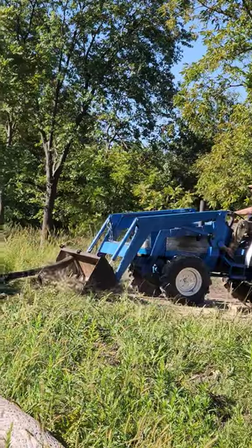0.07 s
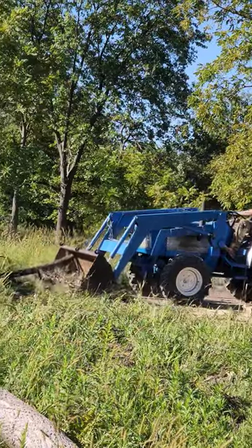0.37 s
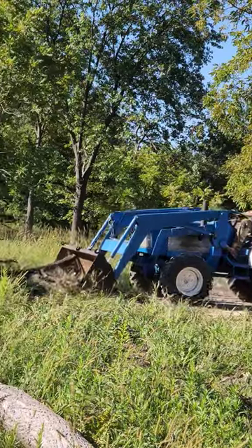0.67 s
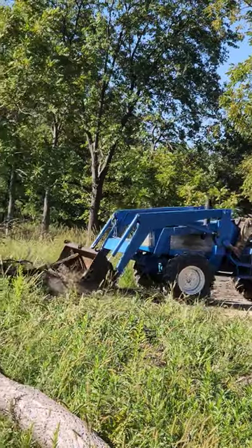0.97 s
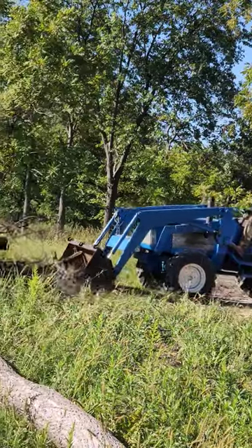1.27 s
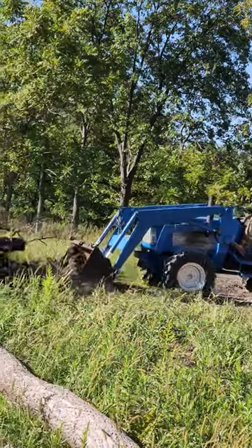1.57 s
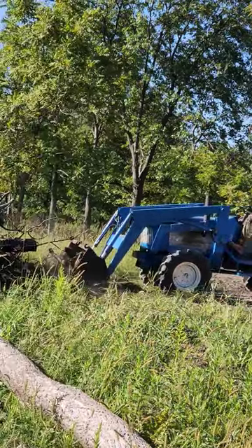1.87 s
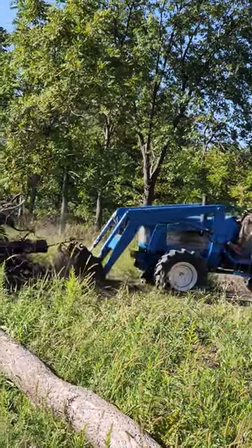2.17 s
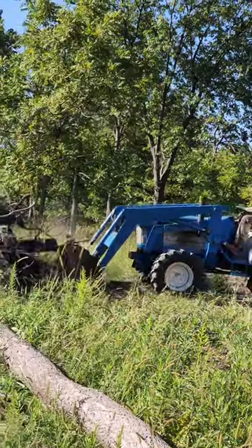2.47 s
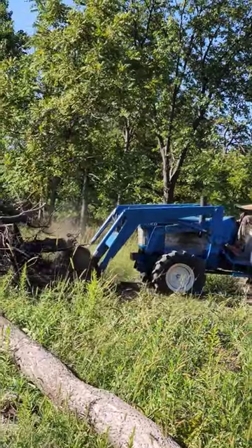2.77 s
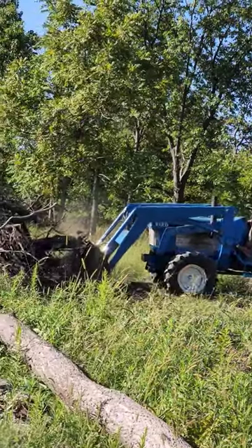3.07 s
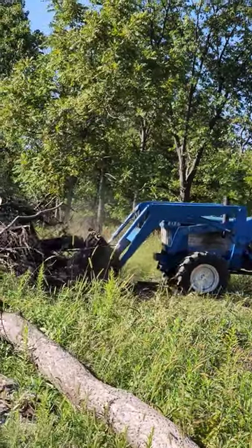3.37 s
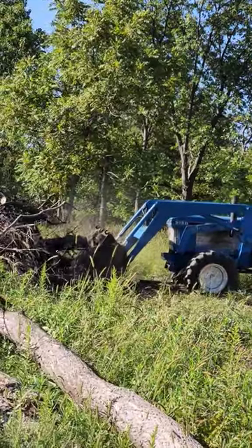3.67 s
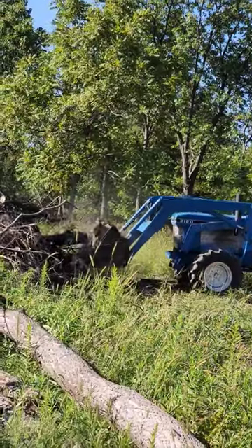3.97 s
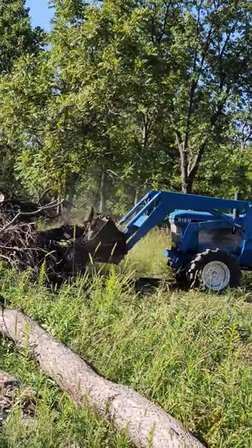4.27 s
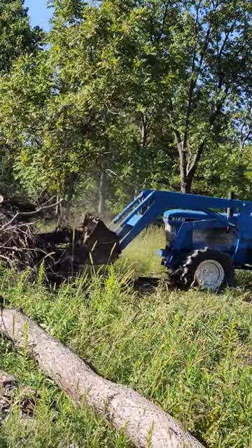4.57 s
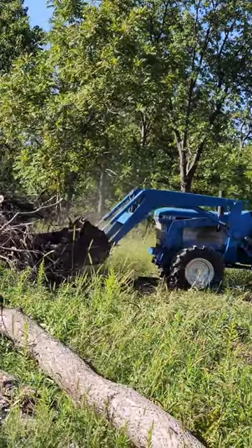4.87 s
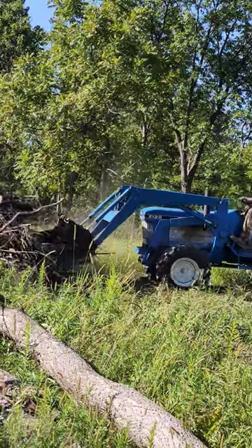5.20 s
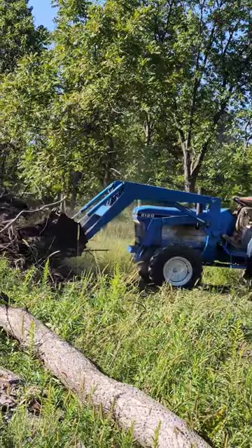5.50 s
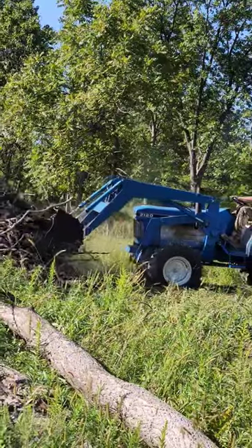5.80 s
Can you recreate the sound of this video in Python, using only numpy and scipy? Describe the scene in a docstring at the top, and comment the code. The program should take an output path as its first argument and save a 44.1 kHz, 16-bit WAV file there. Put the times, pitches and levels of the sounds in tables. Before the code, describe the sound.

A diesel tractor runs throughout, some way off in a field, with a throbbing exhaust, clattering engine and light gear whine. Beneath it, dry twigs rustle and earth grinds as its loader pushes a pile. A sharp branch snap comes at 0.4 seconds, and more cracks follow irregularly, faintly echoed by the trees. Limbs squeak and scrape on the steel bucket from about 0.7 to 1.3 seconds. At 1.7 seconds a log strikes the bucket with a short, hollow boom. More snaps and brief squeaks come between 2.4 and 3 seconds. From 3 to nearly 5 seconds the bucket lifts: the pump rattles and the gears sing louder, the engine speeding up a little around 3.8 seconds. It then slows and works harder, lowest near 5.2 seconds. The rustling and grinding grow, with loud cracks around 5.4 and 5.7 seconds and a squeak between them.

```python
"""A diesel tractor, some way off in a field, shoves logs and brush into a pile with its loader.
From the start the exhaust throbs, the engine clatters and gears whine, over rustling twigs and grinding earth.
Soon branches snap, echoed faintly by the trees, and limbs squeak and scrape on the steel bucket.
Next a log booms against the bucket. Halfway through, the bucket lifts: its pump rattles and the gears
sing louder. Near the end the engine slows under the load and works harder as more branches break."""
import sys
import numpy as np
from scipy import signal
from scipy.fft import rfft, irfft, next_fast_len
from scipy.io import wavfile
from scipy.ndimage import uniform_filter1d, map_coordinates

SR = 44100
rng = np.random.default_rng(int(sys.argv[2]) if len(sys.argv) > 2 else 0)


def bounce(signal):
    """Save signal as a 16-bit WAV file at the path given by the first command-line argument."""
    frames = np.transpose(np.atleast_2d(signal))
    limited = np.clip(frames, -1, 1)
    pcm = np.round(limited * 32767).astype(np.int16)
    wavfile.write(sys.argv[1], SR, pcm)


N = 261954
FREE_RATE, RATED_RATE = 48.6, 40.61  # engine firings a second: with no load, at rated load


def amp(db):
    """Turn decibels (dB) into a number to multiply a sound by."""
    return 10 ** (np.asarray(db) / 20)


def unit(x):
    """Scale a signal so that its average strength (rms) is 1."""
    return x / np.sqrt(np.mean(x ** 2) + 1e-20)


def along(points, hz):
    """Read between rows of (Hz, value), with all octaves equally wide."""
    pitches, values = np.transpose(points)
    return np.interp(np.log(hz + 1), np.log(pitches + 1), values)


def curve(rows):
    """Join rows of (seconds, value) with straight lines, one value per sample."""
    times, values = np.transpose(rows)
    return np.interp(np.arange(N) / SR, times, values)


def wobble(rate):
    """A smooth random curve through `rate` new values a second."""
    return map_coordinates(rng.standard_normal(int(N * rate / SR) + 4), [np.arange(N) * rate / SR])


def coloured(x, level_db):
    """Make each frequency of x louder or softer by level_db(Hz)."""
    n = x.shape[-1]
    m = 2 * next_fast_len(n // 2 + 4096)
    cepstrum = irfft(np.log(amp(level_db(np.fft.rfftfreq(m, 1 / SR)))))
    cepstrum[1:m // 2] *= 2  # folded so that the filter rings after a hit, never before
    cepstrum[m // 2 + 1:] = 0
    return irfft(rfft(x, m) * np.exp(rfft(cepstrum)))[..., :n]


def spread(pair):
    """Mix two unrelated signals into left and right, most alike in the upper bass."""
    # Each row: frequency in Hz, how alike the sides are from 0 to 1.
    alike = [(60, 0.28), (130, .995), (290, 0.85), (640, 0.79), (1200, 0.19), (2200, 0.92), (4000, 0.47),
             (7000, 0.42), (14000, 0.19)]
    angle = np.arccos(np.clip(along(alike, np.fft.rfftfreq(N, 1 / SR)), 0, .999)) / 2
    mid, side = irfft(rfft(pair) * [np.cos(angle), np.sin(angle)], N)
    return unit(np.array([mid + side, mid - side]))


def add(track, start, sound):
    """Mix a sound into the track at `start` seconds."""
    part = track[..., round(start * SR):][..., :sound.shape[-1]]
    part += sound[..., :part.shape[-1]]


def throb(firings, depth, lead):
    """Swell once per firing, `lead` of a firing ahead of the exhaust puff."""
    return 1 + depth * np.cos(2 * np.pi * (firings + lead))


def governor(rate):
    """Engine load in dB: the further the speed sags, the more fuel the engine is fed."""
    fuel = np.maximum(FREE_RATE - rate, .5) / (FREE_RATE - RATED_RATE)
    return 0.87 * 20 * np.log10(fuel)


def exhaust(firings, load_db):
    """One puff per firing, echoed by the pipe; load strengthens the overtones and the rumbling gas."""
    # Each row: pitch as a multiple of the firing rate, base level in dB.
    tones = [(1, -31), (2, -30.5), (3, -33), (3.5, -87), (4, -33), (4.5, -55), (5, -39), (6, -48), (7, -45),
             (10, -67)]
    # Each row: frequency in Hz, relative level of the rumble in dB.
    rumble_colour = [(20, -46), (38, -2.5), (70, -4), (110, -1), (165, 0.5), (230, -4), (300, -10),
                     (380, -23.5), (450, -14), (540, -38), (900, -40.5)]
    note = np.zeros(N)
    for multiple, db in tones:
        db_per_load = np.interp(multiple, [0.79, 1.7, 5.1, 6], [-0.29, 0.49, 0.77, 2.2])
        flutter_db = 0.2 * np.sqrt(multiple / 2) * wobble(15)
        angle = 2 * np.pi * multiple * firings - 0.036 * multiple ** 2  # the muffler delays high tones
        echo = .45 * np.cos(angle - 2 * np.pi * multiple * .6)
        note += np.sqrt(2) * amp(db + db_per_load * load_db + flutter_db) * (np.cos(angle) + echo)
    gas = rng.standard_normal((2, N)) * throb(firings, depth=0.27, lead=0.29)
    rumble = spread(coloured(gas, lambda hz: along(rumble_colour, hz)))
    return note + amp(-35 + 0.73 * load_db) * rumble


def casing(hz):
    """How strongly the engine block and its panels ring at each frequency, in dB."""
    # Each row: frequency in Hz, relative level in dB.
    block = [(250, -38.5), (420, -15), (560, -12.5), (650, -4), (800, -3), (1000, 1.5), (1300, -0.5),
             (1480, -8), (1950, -5), (2700, -10), (3400, -16.5), (4300, -17), (8000, -28), (12000, -47)]
    # Each row: a panel's pitch in Hz, width in Hz, boost or cut in dB.
    panels = [(668, 57, 3.5), (800, 36, 6), (960, 99, 2), (1308, 200, 5), (1580, 120, -2), (1960, 390, 1.5),
              (2337, 52, -28), (2693, 260, 7)]
    panels_db = sum(db / (1 + (2 * (hz - centre) / width) ** 2) for centre, width, db in panels)
    return along(block, hz) + panels_db


def clatter(firings, colour, cycle_firings=3, knocks_per_firing=12):
    """A pattern of knocks repeats each engine cycle and rings metal whose tone is colour(Hz), in dB."""
    count = cycle_firings * knocks_per_firing
    places = (np.arange(count) + rng.uniform(-.5, 0.4934, count)) / knocks_per_firing
    pattern = throb(places, depth=0.38, lead=0.21) * amp(2.04 * rng.standard_normal(count))
    cycles = np.arange(-cycle_firings, firings[-1], cycle_firings)[:, None]
    at = np.interp((cycles + places).ravel(), firings, np.arange(N), left=-N, right=-N)
    at += SR * 3e-5 * rng.standard_normal(len(at))  # each knock lands a little early or late
    blows = (pattern * amp(2.85 * rng.standard_normal((len(cycles), count)))).ravel()
    inside = (at > 0) & (at < N - 1)
    knocks = np.bincount(np.round(at[inside]).astype(int), blows[inside], N)
    t = np.arange(SR // 30) / SR
    spectrum = rfft(rng.standard_normal((2, len(t))) * amp(-60 * t / 0.033))
    smear = irfft(spectrum / np.abs(spectrum))  # each knock spreads evenly over all pitches
    rattle = unit(signal.fftconvolve(knocks[None], smear, axes=1)[:, :N])
    rush = rng.standard_normal((2, N)) * throb(firings, depth=0.08, lead=0.24)
    return spread(coloured(rattle + amp(-6) * rush, colour))


def gears(firings, rate):
    """Meeting gear teeth whine, loudest when their pitch matches a note at which the housing rings."""
    # Each row: teeth per firing, housing note in Hz, its width in Hz, base level on that note in dB.
    wheels = [(15, 647, 52, -48.5), (30, 1346, 60, -49)]
    out = np.zeros(N)
    for teeth, ring_hz, width_hz, db in wheels:
        ring = 1 / (1 + (2 * (teeth * rate - ring_hz) / width_hz) ** 2)
        level = amp(db + 3 * wobble(24.96) + 2 * wobble(3.92))  # a fast waver and a slow swell
        out += ring * level * np.sin(2 * np.pi * teeth * firings + 0.33 * wobble(50))
    return out


def brush(firings):
    """Dry twigs crackle in clumps over a hiss that pulses with the engine."""
    # Each row: frequency in Hz, relative level in dB.
    colour = [(1500, -13.5), (2600, 0.5), (3300, 10), (4400, -4.5), (5200, 2.5), (7900, 0.5), (9900, -9.5),
              (11600, -3.5), (13500, -5), (15500, -10)]
    clumps = wobble(16)
    breaks = rng.random(N) < 260 / SR * amp(6 * clumps)
    twigs = breaks * amp(np.minimum(4.6 * rng.exponential(size=N), 15))
    t = np.arange(SR // 60) / SR
    tick = rng.standard_normal((2, len(t))) * amp(-60 * t / 0.01)
    crackle = signal.fftconvolve(twigs[None], tick, axes=1)[:, :N]
    hiss = rng.standard_normal((2, N)) * throb(firings, depth=0.42, lead=0.25) * amp(0.53 * clumps)
    return spread(coloured(hiss + amp(-4.5) * unit(crackle), lambda hz: along(colour, hz)))


def earth(load_db):
    """Soil and logs grind along in lumps, louder the more the push loads the engine."""
    # Each row: frequency in Hz, relative level in dB.
    colour = [(120, -13.5), (190, -1.5), (270, 1), (350, -7), (450, -17), (560, -27), (740, -10.5),
              (1000, -13.5), (1500, -31), (3000, -46)]
    grind = spread(coloured(rng.standard_normal((2, N)), lambda hz: along(colour, hz)))
    lumps_db = 2.5 * wobble(20)
    return amp(-44 + 1.7 * load_db + lumps_db) * grind


def snap(db, bright_db, fade_s, bright_from_hz=830):
    """Wood breaks with one sharp crack; its fibres go on splintering for a moment."""
    # Each row: frequency in Hz, relative level in dB.
    colour = [(300, -24), (1000, -13.5), (2600, -3), (4200, 0.5), (5500, -2.5), (8300, -2.5), (10000, -12),
              (11600, -4), (13500, -14), (15500, -21)]
    t = np.arange(SR // 8) / SR
    grain = rng.standard_normal(len(t)) + 0.95 * rng.standard_normal((2, len(t)))
    fibres = unit(uniform_filter1d(rng.exponential(size=len(t)) ** 2, size=30))
    splinters = amp(-21 + 0.53 * db - 60 * t / .07) * fibres
    burst = grain * (amp(db - 60 * t / fade_s) + splinters)
    crack = coloured(
        burst, lambda hz: along(colour, hz) + bright_db * np.log2(np.maximum(hz / bright_from_hz, 1)))
    return amp(db) * crack / crack[:, :130].std()  # the first 3 milliseconds set the level


def snaps(sticks_per_s=2):
    """Big branches break, and small sticks give way at random between them."""
    # Each row: start in seconds, level in dB, treble boost in dB per octave, seconds to fade by 60 dB.
    branches = [(0.412, -21, -1.5, 0.01), (0.6291, -29.5, -6.5, 0.011), (0.702, -36.5, 5, .01),
                (0.7804, -27.5, 5, 0.0072), (1.084, -33.5, -3.5, .008), (1.356, -34.5, -0.5, 0.027),
                (1.690, -29.5, 0.5, 0.016), (2.384, -30, 2.5, .008), (2.5297, -29.5, -0.5, .007),
                (2.690, -34.5, 1, 0.034), (2.9031, -25.5, -2.5, 0.0092), (3.024, -35.5, -1, .015),
                (4.289, -35, -5, .006), (4.4436, -33, -2.5, 0.0071), (4.782, -35.5, 3, 0.008),
                (5.081, -35.5, 4, .008), (5.162, -35.5, 1, .008), (5.365, -30, 2, 0.009),
                (5.3712, -21, -9, 0.025), (5.392, -28.5, -3.5, 0.012), (5.72, -26, -1, .012)]
    out = np.zeros((2, N))
    for start, db, bright_db, fade_s in branches:
        add(out, start, snap(db, bright_db, fade_s))
    for place, softer_db in rng.random((round(sticks_per_s * N / SR), 2)):
        add(out, place * N / SR, snap(-37.5 - softer_db, bright_db=0, fade_s=.008))
    return out


def trees(sound):
    """The tree line scatters a sound back as a soft, half-second echo."""
    t = np.arange(SR // 2) / SR
    tail = rng.standard_normal((2, len(t))) * amp(-60 * t / .5) * (1 - np.exp(-t / 0.077))
    return signal.fftconvolve(sound, tail / np.linalg.norm(tail[0]), axes=1)[:, :N]


def slip(length_s, start_hz, end_hz, rough):
    """Wood catches and slides on steel, making a rough chirp that swells and fades."""
    n = int(length_s * SR)
    scatter = unit(uniform_filter1d(rng.standard_normal(n), size=40))
    hz = np.linspace(start_hz, end_hz, n) * (1 + rough * scatter)
    return np.hanning(n) * np.sin(2 * np.pi * np.cumsum(hz) / SR)


def squeaks(scrape_hz=1345, scrape_fall=0.0726):
    """Single limbs squeak on the bucket; its scraping is a run of overlapping, falling squeals."""
    # Each row: start in seconds, length in seconds, first pitch in Hz, last pitch in Hz, peak in dB.
    limbs = [(0.737, 0.037, 3000, 2550, -35), (2.606, 0.031, 2830, 2680, -31),
             (2.956, 0.049, 1866, 1930, -36), (5.602, 0.038, 3450, 2690, -33)]
    out = np.zeros(N)
    for start, length_s, start_hz, end_hz, db in limbs:
        add(out, start, amp(db) * slip(length_s, start_hz, end_hz, rough=.075))
    for start in np.arange(0.93, 1.2, .088):
        add(out, start, amp(-37.5) * slip(0.116, scrape_hz, scrape_hz * (1 - scrape_fall), rough=0.032))
    return out


def booms():
    """A log knocks on the bucket, whose broad plate swells into a short, hollow boom."""
    # Each row: start in seconds, level of the boom in dB, level of the knock in dB.
    hits = [(1.7347, 2, -22), (1.82, -18, -37)]
    # Each row: a pitch of the bucket in Hz, relative level in dB, seconds to fade by 60 dB.
    bucket_notes = [(219, 2, 0.11), (198, -20, 0.049), (258, -11.5, 0.099), (335, -19, 0.18),
                    (483, -22, 0.035), (653, -19, 0.055), (833, -34, 0.12)]
    knock_colour = [(150, 8), (700, 11), (1600, -1), (5000, -16)]  # Each row: Hz, relative dB.
    out, t = np.zeros(N), np.arange(SR // 2) / SR
    ring = sum(amp(db - 60 * t / fade_s) * np.sin(2 * np.pi * hz * t) for hz, db, fade_s in bucket_notes)
    swell = 1 - np.exp(-t / .013)
    for start, boom_db, knock_db in hits:
        knock = unit(coloured(rng.standard_normal(len(t)), lambda hz: along(knock_colour, hz)))
        add(out, start, amp(boom_db) * ring * swell + amp(knock_db - 60 * t / 0.079) * knock)
    return out


def pump(firings, rate, lift_start_s=2.96, lift_end_s=4.85, ramp_s=0.12):
    """The oil pump rattles while it lifts the bucket, and the gears that always drive it sing louder."""
    # Each row: frequency in Hz, relative level of the rattle in dB.
    colour = [(1000, -17.5), (1600, -10), (1850, 3.5), (2150, 8.5), (2450, -10), (2900, -4), (3400, -4),
              (4500, -24.5)]
    t = np.arange(N) / SR
    lift = np.clip(np.minimum(t - lift_start_s, lift_end_s - t) / ramp_s, 0, 1)
    rattle = clatter(firings, lambda hz: along(colour, hz))
    return amp(-50) * lift * rattle + amp(5 * lift) * gears(firings, rate)


def scene():
    """The engine's speed drives all its sounds; the bucket stirs brush and earth, and wood breaks."""
    # Each row: time in seconds, engine firings a second.
    speed = [(0.1, 42.79), (0.3, 43.09), (0.52, 41.92), (0.82, 43.17), (1.2, 42.27), (1.72, 40.73),
             (2.25, 42.31), (2.68, 40.36), (3.05, 42.58), (3.35, 43.07), (3.75, 45.78), (4.15, 45.19),
             (4.52, 42.99), (4.85, 40.12), (5.2, 38.26), (5.94, 40.85)]
    # Each row: time in seconds, base level of the rustling brush in dB.
    rustle = [(0.27, -47), (0.36, -47.5), (1.49, -44), (2.02, -50.5), (3.3, -47.5), (4.31, -47.5),
              (4.74, -49.5), (5.12, -46), (5.51, -42.5), (5.94, -43.5)]
    rate, rustle_db = curve(speed), curve(rustle)
    firings = np.cumsum(rate * (1 + .0015 * wobble(30))) / SR  # a running count
    firings -= firings[round(0.1 * SR)]  # one firing falls at 0.1 seconds
    load_db = governor(rate)
    # The pipe draws away from the microphones, played here as a slowly easing exhaust load.
    away_db = 0.37 * (np.arange(N) - N / 2) / SR
    push_db = rustle_db - rustle_db.mean()
    clatter_db = -36.5 + 0.17 * (rate - RATED_RATE) + 0.19 * push_db  # grows with speed and push
    engine = exhaust(firings, load_db - away_db)
    engine += amp(clatter_db) * clatter(firings, casing)
    engine += pump(firings, rate)
    ground = amp(rustle_db + 2.5) * brush(firings) + earth(load_db)
    wood = booms() + squeaks() + snaps()
    return engine + ground + wood + amp(-22) * trees(wood)


def record(dry, start_s=0.086, top_hz=15700):
    """Two microphones, each with its own tone; the sound opens after a moment and has no top treble."""
    # Each row: frequency in Hz, how much louder the left is than the right in dB.
    lean = [(50, -1.1), (150, -0.1), (270, -3.5), (450, 4.5), (740, 2.5), (1200, 5), (2000, 0), (3300, 0),
            (5300, 9.5), (8500, 0.5), (14000, 1)]
    m = next_fast_len(N + 8192)
    hz = np.fft.rfftfreq(m, 1 / SR)
    microphones = amp(np.outer([.5, -.5], along(lean, hz)))
    fade_in = np.clip((np.arange(N) / SR - start_s) / .01, 0, 1)
    return irfft(rfft(dry * fade_in, m) * microphones * (hz < top_hz), m)[:, :N]


dry = scene()
out = record(dry)
bounce(out)
```